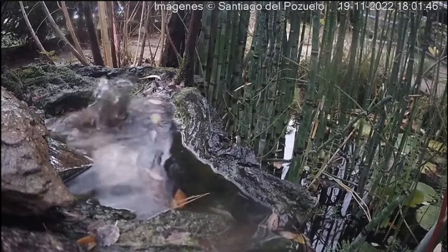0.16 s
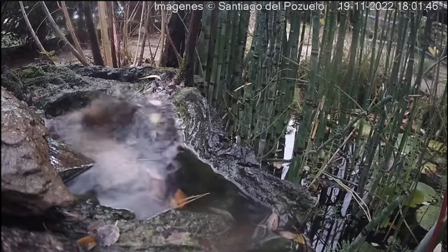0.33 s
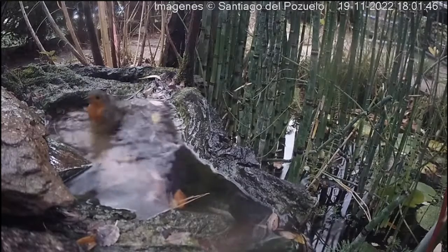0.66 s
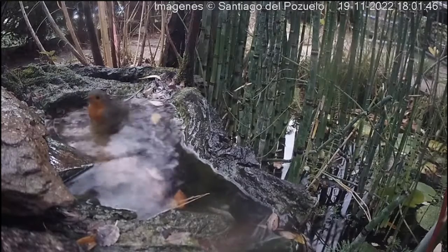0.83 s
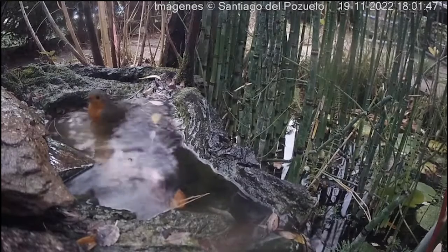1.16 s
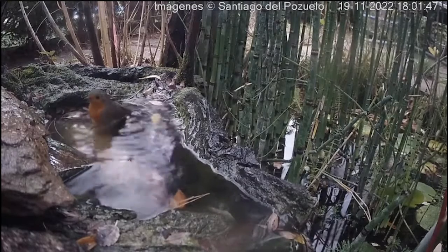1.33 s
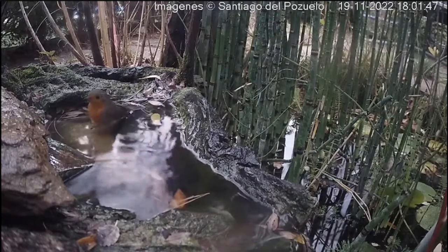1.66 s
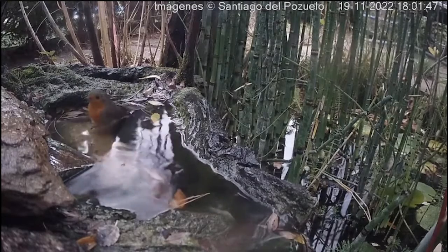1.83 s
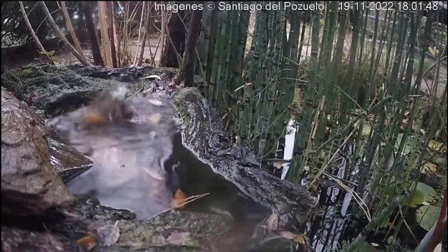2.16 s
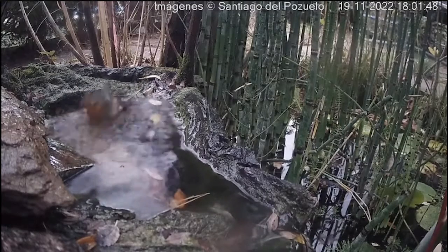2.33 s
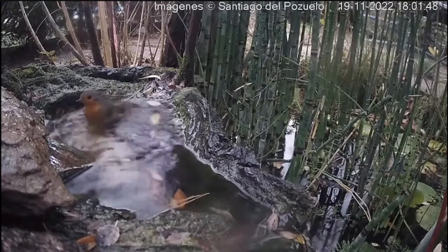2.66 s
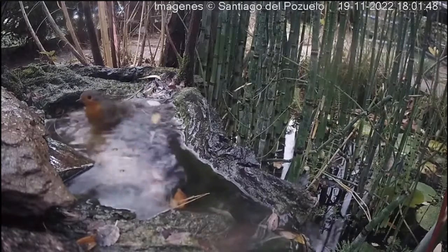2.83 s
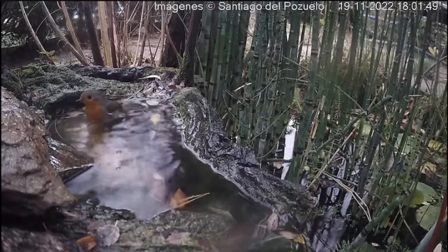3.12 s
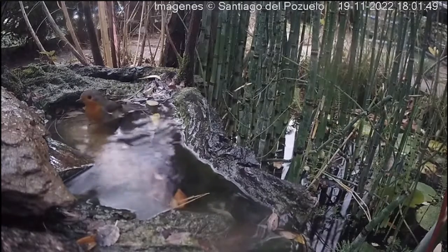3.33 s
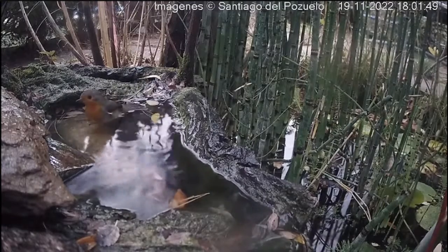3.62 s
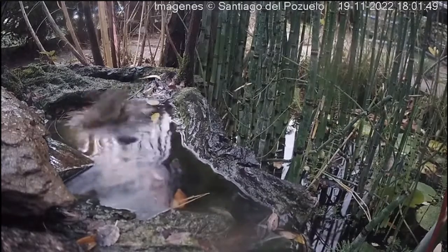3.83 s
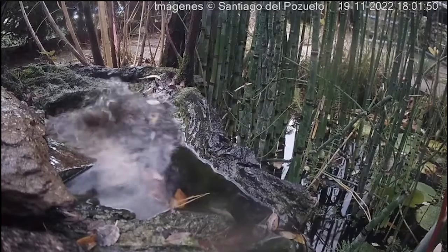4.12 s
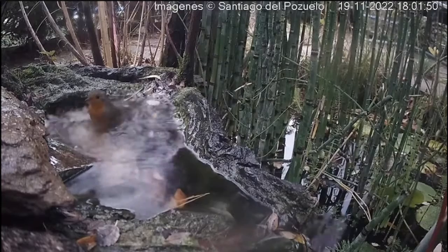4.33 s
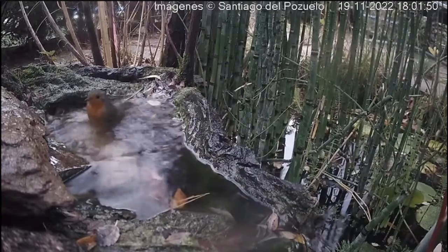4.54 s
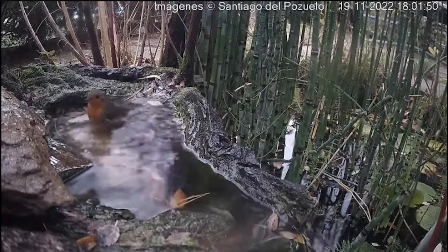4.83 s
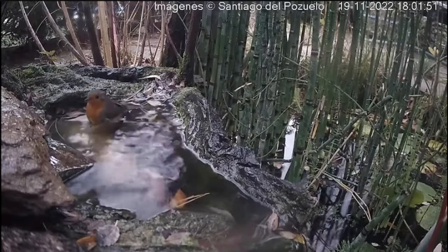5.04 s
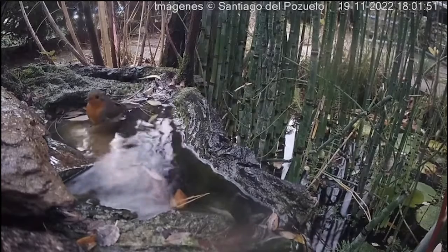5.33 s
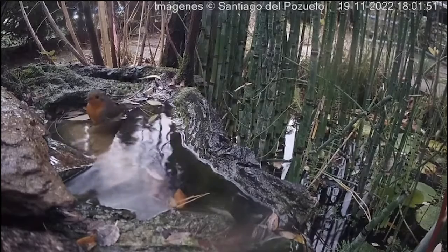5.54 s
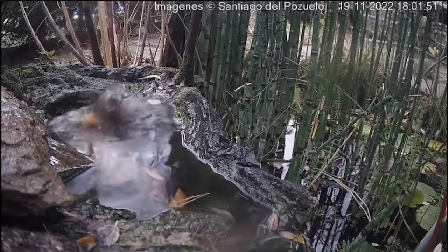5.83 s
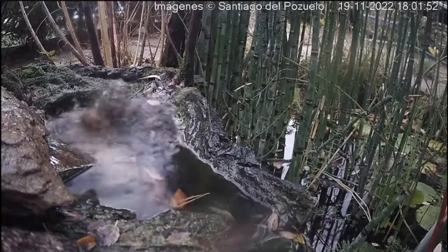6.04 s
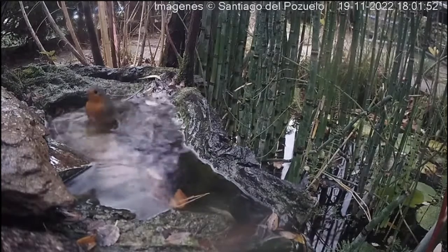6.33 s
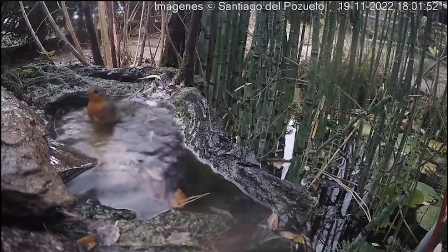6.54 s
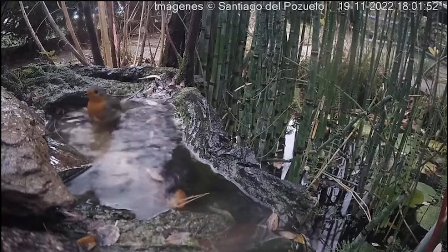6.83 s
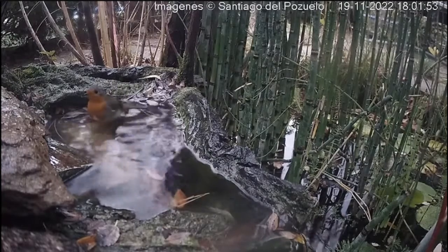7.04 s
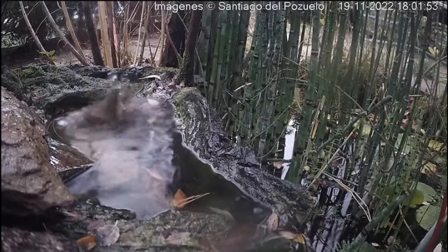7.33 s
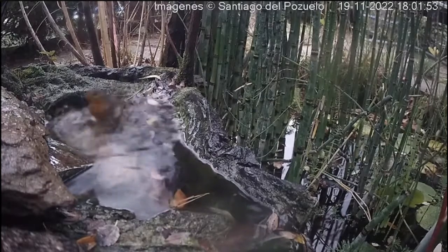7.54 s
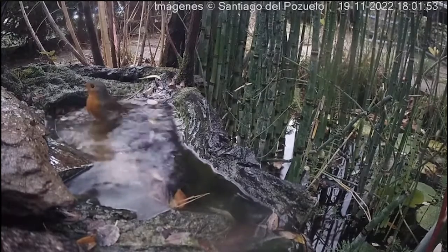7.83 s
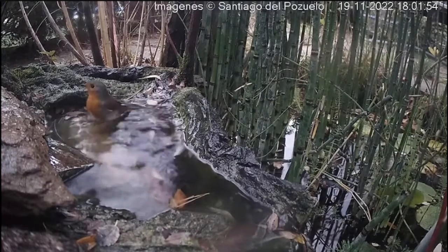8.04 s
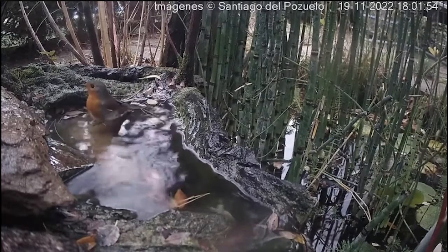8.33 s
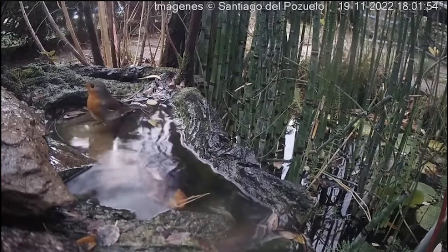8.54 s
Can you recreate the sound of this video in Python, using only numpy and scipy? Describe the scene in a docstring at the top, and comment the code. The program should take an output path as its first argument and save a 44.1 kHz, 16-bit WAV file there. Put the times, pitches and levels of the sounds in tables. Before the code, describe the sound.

Bursts of fast watery wing flutter, plopping and crackling in a small pond, separated by quiet pauses above a deep far-off traffic rush.

```python
"""A small bird bathes in a shallow garden pool, slapping its wet wings some twenty times a second in bursts.
Each slap is a low ring of trapped air, a crack of the surface and a dragged sheet of noise. Around it the
churned water fizzes, bubbles chirp upward, thrown drops tick on leaves and stones, wide clicks mark the onset
of bubbles and slaps and spray sloshes, all with a short leafy tail. Far off are traffic rumble, its rush and
a motor drone, made of shaped noise like the faint hiss of air and microphone."""
import sys
import numpy as np
from scipy import signal
from scipy.fft import rfft, irfft
from scipy.io import wavfile
from scipy.ndimage import uniform_filter1d

SR = 44100
rng = np.random.default_rng(int(sys.argv[2]) if len(sys.argv) > 2 else 0)


def unload_wav(signal):
    """Save mono or channel-first audio to the path in sys.argv[1] as 16-bit WAV at rate SR, clipped to [-1, 1]."""
    wavfile.write(
        sys.argv[1],
        SR,
        np.round(np.clip(np.atleast_2d(signal).T, -1, 1) * 32767).astype(np.int16),
    )


N = 382347  # samples


def gain_of(db):
    """Amplitude factor of a level in dB."""
    return 10 ** (np.asarray(db) / 20)


def evened(x):
    """Scales a sound to an rms of one."""
    return x / np.sqrt(np.mean(x ** 2) + 1e-20)


def peaked(x, db):
    """Scales a sound to a peak level in dB."""
    return gain_of(db) * x / (abs(x).max() + 1e-12)


def read_colour(colour, hz):
    """Reads a spectrum in dB along a logarithmic frequency axis."""
    f, db = np.transpose(colour)
    return np.interp(np.log(hz + 1), np.log(f + 1), db)


def add(mix, s, sound):
    """Lays a sound into the mix from a time in seconds."""
    part = mix[max(round(s * SR), 0):][:len(sound)]
    part += sound[:len(part)]


def ring(hz, t60, soft_s):
    """A tone dying by 60 dB in t60 seconds, with a soft start."""
    t60 = np.clip(t60, 0.003, 0.1)
    t = np.arange(round(t60 * SR)) / SR
    tone = np.sin(2 * np.pi * np.minimum(hz, 16000) * t)
    return tone * gain_of(-60 * t / t60) * (1 - np.exp(-t / soft_s))


def noise(colour, size, patchy_db, flicker_db):
    """Random short-time spectra with drifting patches and a flicker shared by all bins."""
    hop = size // 4
    frames, hz = N // hop + 5, np.fft.rfftfreq(size, 1 / SR)
    real, imag, patches = rng.standard_normal((frames, len(hz), 3)).T
    patches = uniform_filter1d(patches, size=9, axis=0)
    patches = evened(uniform_filter1d(patches, size=9, axis=1))
    flicker = evened(uniform_filter1d(rng.standard_normal(frames), size=3))
    level_db = read_colour(colour, hz)[:, None] + patchy_db * patches + flicker_db * flicker
    spectra = (real + 1j * imag) * gain_of(level_db)
    return evened(signal.istft(spectra, nperseg=size, noverlap=size - hop)[1][:N])


def droplets(colour, per_s, spread_db, cycles):
    """A crowd of tiny bubbles on 36 pitches, each pitch struck per_s times a second at random levels."""
    out = np.zeros(N)
    for hz, luck in zip(np.geomspace(800, 11000, num=36), rng.random(36)):
        chance = rng.random(N) * SR / per_s + 1e-9
        born = chance < 1
        strength = np.zeros(N)
        strength[born] = gain_of(spread_db * np.minimum(-np.log(chance[born]), 4))
        t = np.arange(round(cycles * (0.54 + luck) / hz * SR)) / SR
        life = t / t[-1]
        swell = np.sin(np.pi * np.sqrt(life)) ** 2
        blip = swell * np.sin(2 * np.pi * hz * t * (1 + 0.062 * life))
        out += signal.oaconvolve(strength, gain_of(read_colour(colour, hz)) * hz * blip)[:N]
    return evened(out)


def tilted(x, tilt_db):
    """Turns a sound darker or brighter, in dB per octave between 500 and 7000 Hz."""
    octaves = np.log2(np.clip(np.fft.rfftfreq(len(x), 1 / SR), 500, 7000) / 1500)
    return irfft(rfft(x) * gain_of(tilt_db * octaves), len(x))


def shaped(x, envelope):
    """Lays an envelope on a ragged sound so that the whole has the energy of the envelope."""
    return evened(x * envelope) * np.sqrt(np.mean(envelope ** 2))


def gusts():
    """Random swells, several a second: sixteen slow sines at 5-24 Hz, rms one."""
    t = np.arange(N) / SR
    return evened(sum(np.sin(2 * np.pi * (f * t + rng.random())) for f in np.geomspace(5, 24, num=16)))


# far traffic, deep rumble: colour (f/Hz, relative level/dB per Hz)
RUMBLE_COLOUR = [(7, -52), (12, 4.5), (28, 6), (40, -3), (62, 5.5), (90, -2), (125, -2), (160, -9.5),
                 (200, -23.5), (260, -47), (440, -120)]
# its course before the swells: (t/s, level/dB)
RUMBLE_LEVEL = [(0.0, -33), (0.9, -40.5), (1.13, -33), (1.88, -35.5), (2.05, -30.5), (2.34, -38),
                (2.8, -32.5), (3.2, -30.5), (3.52, -38.5), (4.45, -30.5), (4.6, -38.5), (5.3, -37),
                (5.65, -35.5), (6.33, -39), (6.57, -34), (7.03, -36), (7.8, -36.5), (8.04, -39.5),
                (8.67, -41.5)]
GUST_DB = 2.5  # rms depth of the swells


def rumble(swells):
    """Far traffic as deep noise that rises and falls with the swells."""
    level_db = np.interp(np.arange(N) / SR, *np.transpose(RUMBLE_LEVEL)) + GUST_DB * swells
    return gain_of(level_db) * noise(RUMBLE_COLOUR, size=2048, patchy_db=1.0, flicker_db=2.0)


# course of the higher background: (t/s, rush level/dB, hiss level/dB)
HIGH_LEVELS = [(0.0, -41.5, -62.5), (1.9, -40.5, -62.5), (3.16, -40, -61.5), (4.47, -39.5, -63),
               (4.7, -44, -67.5), (5.9, -42.5, -64.5), (6.3, -44.5, -66.5), (7.44, -42.5, -65),
               (8.67, -44, -65)]


def high_levels():
    """Gains of the rush and of the hiss over time."""
    s, *columns = np.transpose(HIGH_LEVELS)
    return [gain_of(np.interp(np.arange(N) / SR, s, db)) for db in columns]


# rush of the far traffic: colour (f/Hz, relative level/dB per Hz)
RUSH_COLOUR = [(65, -40), (110, 1.5), (490, -8.5), (1290, -23.5), (2120, -41), (3000, -43.5), (3900, -53.5),
               (6600, -120)]


def rush(level, swells):
    """The higher rush of the traffic, swelling only slightly."""
    return level * gain_of(0.34 * swells) * noise(RUSH_COLOUR, size=512, patchy_db=2.0, flicker_db=1.3)


# far motor, levels before they follow the rush: (f/Hz, width/Hz, level/dB, middle of the fade-out t/s)
DRONE = [(60.8, 8.9, -46, 7.9), (120.5, 10.4, -45, 5.17), (176.4, 4.2, -48, 6.3), (260.3, 5.2, -55.5, 5.9),
         (298, 8.2, -46, 0.83)]


def drone(rush_level):
    """A far motor: noise through narrow resonances wavers as it hums; each tone fades out in turn."""
    t, out = np.arange(N) / SR, np.zeros(N)
    for hz, width, db, end in DRONE:
        r = np.exp(-np.pi * width / SR)
        resonance = [1, -2 * r * np.cos(2 * np.pi * hz / SR), r * r]
        hum = evened(signal.lfilter([1], resonance, rng.standard_normal(N)))
        out += gain_of(db) * hum / (1 + np.exp(np.clip((t - end) / 0.16, -30, 30)))
    return out * rush_level / rush_level.mean()


# hiss of air and microphone: colour (f/Hz, relative level/dB per Hz)
HISS_COLOUR = [(880, -22), (1500, -1), (2130, -7.5), (4160, -10.5), (4550, -9), (5080, -12), (14700, -21),
               (15900, -21), (16400, -38)]


def hiss(level):
    """Faint high noise of air and microphone."""
    return level * noise(HISS_COLOUR, size=256, patchy_db=3.0, flicker_db=1.0)


def background():
    """All that lies behind the pool: rumble, rush and drone from afar, hiss at the microphone."""
    swells = gusts()
    rush_level, hiss_level = high_levels()
    return rumble(swells) + rush(rush_level, swells) + drone(rush_level) + hiss(hiss_level)


# water churned while the bird ducks, one list a bout, silent between: (t/s, level/dB before the layer gains)
CHURN = [
    [(0.0, -67), (0.09, -62), (0.224, -65), (0.54, -71), (0.958, -88), (1.22, -77)],
    [(1.85, -77), (1.986, -60), (2.12, -62), (2.278, -60), (2.4, -69)],
    [(2.5, -83), (3.0, -64.5)],
    [(3.7, -73), (3.868, -57.5), (4.02, -59), (4.112, -54), (4.334, -72), (4.584, -64), (4.72, -69),
     (4.8, -76)],
    [(5.6, -87), (5.708, -70), (5.904, -66), (6.198, -67.5), (6.444, -73), (6.72, -82)],
    [(7.05, -82), (7.174, -69), (7.306, -67), (7.5, -70)],
]
# its colour: (f/Hz, relative level/dB per Hz)
CHURN_COLOUR = [(470, -33), (800, 4), (1420, 3), (2350, -6), (2830, -6), (3660, -12), (5160, -13.5),
                (7280, -18.5), (15000, -37)]


def churn():
    """Droplets and fine crackle over a wet fizz."""
    t, level = np.arange(N) / SR, np.zeros(N)
    for bout in CHURN:
        s, db = np.transpose(bout)
        level += gain_of(np.interp(t, s, db, -120, -120))
    fizz = noise(CHURN_COLOUR, size=256, patchy_db=7.5, flicker_db=5.5)
    crowd = droplets(CHURN_COLOUR, per_s=170.0, spread_db=3.2, cycles=9.9)
    crackle = droplets(CHURN_COLOUR, per_s=60.0, spread_db=5.0, cycles=3.1)
    return uniform_filter1d(level, size=600) * (0.73 * crowd + 1.32 * fizz + 0.69 * crackle)


def trapped_air(t, hz, attack, ring_s):
    """A pocket of air shut in by the wing rings low and climbs; it is no sphere, so side modes ring too."""
    before, after = np.minimum(t, 0), np.maximum(t, 0)
    low, high = 1 + 0.37 * (rng.random(2) - 0.5)
    phase = np.round(rng.random()) / 2 + 0.12 * rng.random()  # turns: either polarity, slightly shifted
    rounded = np.hypot(after, attack) - attack
    air = 0
    for ratio, share, mode_s in (1, 1, ring_s), (1.26 * high, 0.22, 0.24 * ring_s), (0.817 * low, 0.3, ring_s):
        turns = ratio * hz * (t + 0.086 * after ** 2 / ring_s) + phase
        envelope = np.exp(-(before / attack) ** 2) * gain_of(-45 * rounded / mode_s)
        air = air + share * np.cos(2 * np.pi * turns) * envelope
    return air


# modes of the slapped surface: (f/Hz, nominal width/Hz that shortens the ring, relative level/dB)
CRACK_MODES = [(2040, 300, 5.5), (2510, 52, -3.5), (2780, 220, 8), (3750, 150, -10.5), (4440, 670, 5.5),
               (5800, 180, -6.5)]
CRACK_SCATTER, UNEVEN_DB = 0.1, 7  # full span of the random shift of each mode: share of its pitch, level


def surface_crack(tilt_db):
    """The struck surface rings briefly in several modes, never all alike."""
    crack = np.zeros(1200)
    for hz, width, mode_db in CRACK_MODES:
        bend = 1 + CRACK_SCATTER * (rng.random() - 0.5)
        lean_db = mode_db + tilt_db * np.log2(hz / 3000) + UNEVEN_DB * (rng.random() - 0.5)
        add(crack, 0, gain_of(lean_db) * ring(hz * bend, min(3.3 / width, 0.008), soft_s=0.00018))
    return crack


def dragged_sheet(t, wet, tilt_db):
    """A sheet of water swells and dies within milliseconds, then runs off the wing."""
    before, after = np.minimum(t, 0), np.maximum(t, 0)
    rise, fall = 1 + 0.37 * (rng.random(2) - 0.5)
    swell = np.exp(before / 0.0015 / rise ** 2 - after / 0.0019 / fall ** 2)
    swell = swell + 0.019 * np.exp(before / 0.00097 - after / 0.0053)  # the run-off
    piece = wet[int(rng.random() * (N - len(t))):][:len(t)]
    return shaped(tilted(piece, 0.37 * tilt_db), swell)


# wing slaps on the pool: (t/s of the peak, air peak level/dB, air f/Hz, crack peak level/dB, attack/s,
# ring time/s, sheet level/dB, brightness/dB per octave); attack and ring time are clipped in slaps()
SLAPS = [(0.025, -39, 1420, -70, 0.0019, 0.022, -46, 1.0),
         (0.2517, -35, 1420, -30.5, 0.0005, 0.005, -53, 8), (0.4241, -40, 1100, -54, 0.0006, 0.01, -53, 14),
         (0.4352, -32.5, 1430, -54, 0.0008, 0.011, -43, -1),
         (0.4834, -43, 860, -52, 0.0006, 0.0045, -41, 0), (0.5485, -36, 1060, -42, 0.00087, 0.004, -40, -1),
         (0.6126, -36.5, 1450, -53, 0.00038, 0.0054, -40.5, -1),
         (0.666, -44, 1040, -57, 0.0014, 0.008, -45, -3),
         (0.678, -29.5, 1480, -51, 0.0007, 0.006, -37, 0.5),
         (0.7336, -30.5, 1410, -39.5, 0.0027, 0.004, -34.5, 9),
         (0.774, -37, 1800, -40, 0.0005, 0.004, -50, 0), (0.7828, -35, 940, -38, 0.0004, 0.004, -47, 0),
         (0.8354, -22, 1220, -39, 0.00046, 0.0027, -36.5, 13),
         (0.8838, -25, 1340, -31, 0.0006, 0.004, -36, 8),
         (0.932, -24.5, 1120, -24.5, 0.00083, 0.016, -38, -1.5),
         (0.9825, -16, 1420, -24, 0.0005, 0.004, -31, 1.5),
         (1.036, -24.5, 820, -32, 0.00052, 0.0058, -30, 5), (1.042, -36, 1980, -31, 0.0011, 0.004, -58, 15),
         (1.0926, -15.5, 1390, -33.5, 0.001, 0.0029, -37, 6),
         (1.1541, -26.5, 1300, -35.5, 0.0021, 0.0045, -39, 8),
         (1.9958, -20.5, 1170, -36, 0.00023, 0.0028, -25.5, -3),
         (2.004, -36, 925, -28, 0.0017, 0.022, -30, -10), (2.5725, -33, 1180, -40, 0.0019, 0.019, -51, -2),
         (2.6233, -23, 1490, -42, 0.00087, 0.0033, -24, -19),
         (2.6324, -16.5, 1290, -38, 0.00071, 0.0062, -33, 7),
         (2.675, -24, 1120, -47, 0.002, 0.011, -34, -6),
         (2.6819, -13.5, 1230, -34, 0.00017, 0.0031, -27.5, 3),
         (2.727, -34, 1380, -39, 0.0007, 0.009, -31, -3),
         (2.7338, -22.5, 1260, -35, 0.00042, 0.0043, -26, 3.5),
         (2.779, -33, 1450, -49, 0.0008, 0.012, -37, -9), (2.7886, -23, 1520, -36, 0.0014, 0.0057, -34, 5),
         (2.8394, -37, 1310, -69, 0.0006, 0.007, -41, -3),
         (2.849, -30, 840, -30.5, 0.0004, 0.0045, -35, -3),
         (2.909, -33.5, 1090, -36, 0.0014, 0.004, -33.5, -3), (2.963, -46, 900, -60, 0.0011, 0.007, -58, 4),
         (3.8731, -37, 1080, -39, 0.0004, 0.019, -45, -6),
         (4.0124, -28, 1400, -52, 0.00079, 0.006, -40, -14),
         (4.1429, -32, 1790, -39, 0.0004, 0.019, -39, 5), (4.1822, -31.5, 970, -33, 0.0005, 0.03, -51, 3),
         (4.343, -34, 1520, -55, 0.00063, 0.0049, -42, 5),
         (4.3924, -33, 850, -52, 0.0009, 0.004, -48, -0.5),
         (4.4366, -41, 835, -54, 0.0025, 0.032, -58, 0.5),
         (4.4957, -33.5, 1530, -49, 0.0012, 0.005, -48, 23),
         (4.542, -34, 1540, -45, 0.00066, 0.02, -44, 1.5),
         (4.5975, -16.5, 1430, -28.5, 0.00035, 0.0051, -31, 5),
         (4.6408, -39, 856, -58, 0.0005, 0.004, -39, -0.5),
         (4.648, -14.5, 1390, -20, 0.00035, 0.0026, -30, 6.5),
         (4.7, -11.5, 1440, -25, 0.00046, 0.004, -29.5, 5),
         (4.761, -29, 1100, -47, 0.0016, 0.0045, -49, 13),
         (5.7655, -40.5, 1150, -53, 0.0005, 0.004, -45, 11),
         (5.8065, -38, 1340, -46, 0.00074, 0.005, -41, -6.0),
         (5.8638, -33, 1310, -51, 0.00099, 0.0073, -46, 0), (5.949, -40, 1060, -52, 0.0012, 0.01, -45, -3),
         (6.036, -38, 1080, -56, 0.0023, 0.008, -53, 7), (6.225, -40, 1250, -53, 0.0013, 0.008, -50, 0),
         (6.2884, -38, 1600, -59, 0.0006, 0.006, -50, -7),
         (6.2962, -31, 1410, -52, 0.00064, 0.007, -44, -12),
         (6.342, -34, 1190, -56, 0.00067, 0.006, -54, 7.0),
         (6.3533, -36, 1520, -60, 0.0013, 0.004, -50, 25),
         (6.401, -27, 1080, -30.5, 0.0006, 0.0049, -37, -2),
         (6.455, -30.5, 1570, -44, 0.0014, 0.0083, -38.5, 8),
         (6.5033, -30, 990, -46, 0.00082, 0.0046, -40, -1), (6.5122, -34, 1520, -43, 0.0019, 0.011, -44, 4),
         (6.5551, -36, 1050, -49, 0.0008, 0.012, -53, 9),
         (6.5647, -22.5, 1200, -40, 0.00053, 0.0032, -31.5, 6),
         (6.6235, -35, 1630, -31.5, 0.0005, 0.0046, -33.5, 4),
         (6.6865, -42, 1000, -62, 0.001, 0.043, -51, -3),
         (7.168, -40, 1250, -54, 0.0005, 0.004, -45.5, -12),
         (7.2263, -24, 980, -58, 0.00051, 0.0027, -35, -13), (7.325, -35, 1300, -54, 0.0007, 0.005, -41, 1),
         (7.3717, -41, 1690, -34.5, 0.0005, 0.006, -46, 3)]
# sheet of water under the wing, also the spray of the sloshes: (f/Hz, relative level/dB per Hz)
WET_COLOUR = [(350, -48), (600, -3.5), (1560, 2.5), (2810, -16.5), (3590, -16.5), (4530, -17), (5930, -32),
              (8840, -34.5), (10200, -39.5), (13000, -46)]


def slaps():
    """The wing drags a sheet of water, shuts in a pocket of air and cracks the surface."""
    out, t = np.zeros(N), np.arange(-600, 1600) / SR
    wet = noise(WET_COLOUR, size=256, patchy_db=4.5, flicker_db=4.0)
    wet = wet + 0.44 * droplets(WET_COLOUR, per_s=40.0, spread_db=1.0, cycles=16.2)
    for s, air_db, hz, crack_db, attack, ring_s, sheet_db, tilt_db in SLAPS:
        attack, ring_s = np.clip(attack, 0.0002, 0.004), np.clip(ring_s, 0.003, 0.04)
        add(out, s + t[0], peaked(trapped_air(t, hz, attack, ring_s), air_db))
        add(out, s - 0.0005, peaked(surface_crack(tilt_db), crack_db))
        add(out, s + t[0], gain_of(sheet_db) * dragged_sheet(t, wet, tilt_db))
    return out


# bubbles in the pool: (t/s of the peak, peak level/dB, f/Hz, length/s, shaped as at least 1.5 ms)
BUBBLES = [(.061, -53, 3970, .003), (.083, -51, 6400, 0.0014), (0.0968, -45.5, 5800, .0015),
           (0.195, -51, 4050, .002), (0.218, -40, 3000, .0015), (0.202, -50, 5910, .004),
           (0.2185, -38, 4500, 0.0015), (0.224, -43, 5010, .0015), (0.226, -49, 3070, .0015),
           (0.247, -35, 3150, .0015), (0.252, -28, 3570, 0.0014), (0.262, -46, 2980, 0.0054),
           (.273, -49, 2980, .002), (0.4141, -50, 4340, 0.0029), (0.6026, -43, 6560, .0015),
           (0.885, -31.5, 2100, 0.0013), (0.977, -36, 990, 0.0026), (1.036, -27.5, 451, 0.0046),
           (1.042, -42, 6150, 0.0014), (1.241, -51, 2310, .003), (0.931, -35, 2950, 0.0014),
           (1.042, -33.5, 2180, 0.0034), (1.4432, -36.5, 3980, 0.0013), (1.72, -47, 2260, 0.0037),
           (1.927, -42, 2940, .0015), (1.9361, -46, 5560, .0015), (1.994, -33, 1830, 0.0037),
           (2.03, -40, 4120, 0.0025), (2.102, -61, 2200, .006), (2.118, -42, 3070, 0.003),
           (2.122, -42, 2850, 0.003), (2.154, -28.5, 2620, 0.0021), (2.156, -26.5, 3000, 0.002),
           (2.1605, -47, 3350, .0015), (2.1606, -40.5, 6360, .0015), (2.209, -49, 3020, .003),
           (2.221, -49, 6700, .0015), (2.232, -46, 5140, .0015), (2.233, -38.5, 2940, 0.005),
           (2.26, -41, 2790, .0015), (2.272, -42, 5710, .0015), (2.276, -29.5, 3480, 0.0021),
           (2.504, -48, 2160, 0.0039), (2.579, -40, 1600, .003), (2.582, -45, 2050, .002),
           (2.664, -50, 2380, 0.0036), (2.668, -48, 2200, .003), (2.523, -46, 2300, 0.0028),
           (2.789, -41, 5000, 0.0017), (2.981, -39, 1470, 0.0027), (2.677, -28, 409.4, 0.0051),
           (3.087, -43.5, 3910, .0015), (3.832, -54, 5090, .003), (3.84, -41.5, 1920, 0.0066),
           (3.895, -50, 2680, .003), (3.827, -52, 4000, .003), (3.962, -48, 3000, .0015),
           (3.965, -50, 2500, .002), (4.01, -42, 2600, .002), (4.095, -42, 2100, .002),
           (4.145, -38, 1800, .003), (3.967, -44, 6260, .0019), (3.989, -39, 3030, .0015),
           (3.993, -46, 6700, .0015), (3.994, -49, 5430, .0015), (4.006, -34, 1480, 0.0033),
           (4.0255, -26, 5260, 0.0019), (4.0264, -34, 2040, 0.0026), (4.03, -36, 3400, 0.002),
           (4.044, -41, 5090, .0015), (4.045, -43, 2780, .0015), (4.0453, -32, 6500, 0.0014),
           (4.0583, -26, 2900, 0.0027), (4.061, -22.5, 2750, 0.0021), (4.0655, -27, 3100, 0.0016),
           (4.089, -38, 2100, 0.0038), (4.107, -33, 1300, 0.0014), (4.1071, -38, 2070, .0015),
           (4.1085, -37, 3970, 0.0036), (4.1191, -33.5, 2610, 0.0013), (4.129, -44, 5160, 0.0022),
           (4.146, -39, 3000, .0015), (4.156, -36, 4160, 0.0017), (4.166, -47, 5260, .003),
           (4.167, -43, 2500, .002), (4.185, -37, 4700, .002), (4.188, -36, 3180, 0.0042),
           (4.216, -56, 4600, .002), (4.2365, -34.5, 5170, 0.0023), (4.266, -41.5, 6400, 0.0014),
           (4.276, -50, 6120, .0015), (4.345, -37, 772, 0.008), (4.39, -42, 700, .005),
           (4.431, -30.5, 520, 0.0042), (4.502, -54, 4050, .0015), (4.454, -49, 4900, .0015),
           (4.5496, -46, 2620, .0025), (4.55, -49, 4100, .0015), (4.538, -40, 1600, .003),
           (4.588, -28, 1151, .003), (4.589, -45, 2990, .002), (4.605, -40, 429, 0.014),
           (4.701, -27, 1900, 0.0021), (4.762, -40, 2200, 0.0022), (4.97, -40, 491, 0.028),
           (4.978, -52.5, 3630, .0035), (5.68, -35, 1740, 0.003), (5.698, -45, 1900, 0.0029),
           (5.716, -52, 5000, .0015), (5.717, -50, 2400, .002), (5.736, -54, 3600, .003),
           (5.851, -52, 2800, .003), (5.765, -49, 1990, 0.0016), (5.766, -44, 4340, .0015),
           (5.8, -49, 5310, 0.0018), (5.815, -37.5, 6000, 0.0022), (5.9303, -44, 6820, 0.0017),
           (5.931, -31.5, 4340, .0015), (5.9347, -35, 4700, .0015), (5.868, -33, 1250, 0.0026),
           (5.95, -43, 3880, 0.0031), (6.0031, -47, 5100, .002), (6.004, -42, 6230, 0.002),
           (6.054, -46, 3880, .002), (6.064, -51, 3860, .002), (6.058, -42, 2790, .0015),
           (6.066, -37, 1860, .002), (6.077, -42, 4870, .0032), (6.081, -34.5, 2440, 0.0038),
           (6.0854, -30.5, 5090, .0015), (6.091, -40, 2930, 0.0014), (6.11, -47, 2800, 0.0043),
           (6.188, -41, 4920, 0.0019), (6.967, -41, 272, .004), (6.96, -27, 445, 0.0028),
           (7.15, -44, 2080, .0015), (7.156, -47, 3030, .0021), (7.145, -47, 900, .003),
           (7.172, -43, 1290, .002), (7.236, -52, 3280, .002), (7.348, -55, 2000, .002),
           (7.17, -47, 2490, .003), (7.255, -52, 2550, .003), (7.273, -47, 2200, .0015),
           (7.28, -45, 1700, .002), (7.371, -34, 3640, 0.0015), (7.392, -49, 2810, .002),
           (7.405, -58, 2850, .002), (7.372, -35.5, 515, 0.019), (7.44, -44, 515, 0.02),
           (7.52, -45.5, 510, 0.022), (7.571, -45.5, 3680, 0.0028), (7.794, -52, 6120, 0.0022),
           (8.3101, -51, 3660, .0015), (8.37, -46.5, 4300, 0.0021)]
RISE = 0.0429  # share by which a bubble's pitch climbs


def bubbles():
    """A bubble swells, sings upward and is torn by the moving water; a small tick as the drop enters."""
    out, t = np.zeros(N), np.arange(-1500, 2500) / SR
    for s, db, hz, length in BUBBLES:
        u = t / np.clip(length, 0.0015, 0.04)
        shape = gain_of(-np.where(u < 0, 20.0 * u ** 2, 13.3 * abs(u) ** 0.79))
        shake = evened(uniform_filter1d(rng.standard_normal(len(t)), size=40))
        bend = 1 + RISE * np.tanh(u) / 2 + 0.037 * shake
        add(out, s + t[0], gain_of(db) * shape * np.sin(2 * np.pi * np.cumsum(hz * bend) / SR))
        add(out, s - 0.46 * length, peaked(ring(1.74 * hz, 0.0012, soft_s=0.0001), db - 22.0))
    return out


# thrown drops ticking on leaves and stones: (t/s, peak level/dB, f/Hz)
TICKS = [(0.075, -48, 11400), (0.176, -49, 9900), (0.2024, -46, 9400), (0.219, -49, 13200),
         (0.2513, -45, 8900), (0.275, -48, 9800), (0.29, -50, 8500), (0.571, -49, 12000),
         (0.6025, -39.5, 7430), (0.7896, -46, 10600), (0.9303, -44, 8500), (1.1104, -50, 14800),
         (1.1648, -48, 11200), (1.509, -41, 10740), (1.5693, -49, 8690), (1.604, -47, 7300),
         (1.717, -47, 8970), (1.997, -40, 11360), (1.9959, -42, 8450), (2.1735, -47, 9080),
         (2.2648, -49, 8700), (2.426, -47, 8830), (2.5606, -40, 8100), (2.6863, -34, 9800),
         (2.7797, -39, 10600), (2.843, -40, 8660), (3.0856, -42, 10900), (3.086, -43, 15000),
         (3.4516, -46, 9800), (3.6067, -47, 8130), (3.8611, -44, 8000), (3.9459, -46, 8550),
         (3.993, -44, 8900), (4.0225, -40, 7640), (4.0657, -41, 7900), (4.095, -48, 12800),
         (4.2153, -43, 13200), (4.247, -48, 12000), (4.4149, -47, 8140), (4.647, -44, 10100),
         (4.6972, -33.5, 7280), (5.2046, -51, 8200), (5.8072, -46, 9900), (5.9284, -44, 8200),
         (6.0841, -49, 13600), (6.8977, -48, 11500), (7.3632, -42, 13300), (7.651, -50, 8000),
         (7.7039, -45, 9600), (7.7328, -47, 11000), (8.3843, -49, 11100), (8.5255, -47, 9960),
         (8.5884, -47, 9890)]
TICK_T60_S, FAINT_TICK_DB, FAINT_SPREAD_DB = 0.01, -64.5, 17.5  # faint ticks: lowest level, span above it


def ticks():
    """Short bright puffs around one pitch; fainter ones fall at random."""
    out = np.zeros(N)
    faint = rng.random((120, 3)) * [N / SR, FAINT_SPREAD_DB, 9000] + [0, FAINT_TICK_DB, 5000]
    for s, db, hz in [*TICKS, *faint]:
        tone = ring(hz, TICK_T60_S, soft_s=0.00026)
        ragged = uniform_filter1d(rng.standard_normal(4410), size=6)[:len(tone)]
        add(out, s, peaked(tone * (1 + 2.2 * ragged), db))
    return out


# wide clicks at the onset of bubbles and slaps: (t/s, peak level/dB, middle f/Hz)
ONSET_CLICKS = [(0.218, -38, 3500), (0.602, -45, 7000), (0.885, -31, 3020), (0.982, -21.5, 2390),
                (1.936, -42, 4500), (1.946, -39, 2300), (1.989, -35, 1900), (2.029, -33, 3600),
                (2.095, -44, 2800), (2.114, -48, 3500), (2.221, -44, 6500), (2.231, -42, 3800),
                (2.259, -44, 2800), (2.274, -42, 4200), (2.6235, -33, 2600), (2.681, -23, 2200),
                (2.733, -36, 2600), (3.988, -46, 2800), (4.0245, -25, 5060), (4.044, -36, 3500),
                (4.057, -36, 4000), (4.086, -44, 2200), (4.107, -36, 2600), (4.129, -40, 4500),
                (4.144, -30, 2600), (4.156, -44, 3800), (4.178, -36, 4200), (4.188, -35, 2500),
                (4.206, -42, 2500), (4.216, -48, 4000), (4.649, -30, 2600), (4.6991, -20, 2180),
                (5.764, -49, 3200), (5.864, -39, 2200), (5.929, -40, 5500), (6.003, -42, 5800),
                (6.047, -46, 3000), (6.057, -46, 2300), (6.081, -45, 3200), (6.086, -40, 6000),
                (6.106, -46, 3300), (6.119, -50, 5000), (7.2252, -36, 1900), (7.268, -43, 3000),
                (7.341, -48, 4200), (7.371, -30, 3600)]
CLICK_CYCLES = 1  # cycles in which the click decays to 1/e


def onset_clicks():
    """Wide clicks at the onset of bubbles and slaps: about one swing of pressure and a weaker, later second."""
    out = np.zeros(N)
    t = np.arange(-100, 200) / SR
    for s, db, hz in ONSET_CLICKS:
        turns = t * hz
        decay = np.exp(-abs(turns) / np.where(turns < 0, 0.3, CLICK_CYCLES))
        click = np.sin(2 * np.pi * (turns + rng.random())) * decay
        delay = 0.00048 + 0.0019 * rng.random()
        add(out, s + t[0], peaked(click, db))
        add(out, s + t[0] + delay, peaked(click, db - 9.0))
    return out


# short sheets of water thrown up: (t/s of the middle, level/dB, tilt/dB per octave)
SLOSHES = [(0.225, -47, 7), (0.255, -45.5, 4), (0.779, -49, 5), (0.926, -49.5, -6), (1.032, -51, 0),
           (1.939, -52, 6), (2.031, -48, 5), (2.103, -48, 0.5), (2.231, -49, 6), (2.267, -54, 12),
           (2.574, -42.5, 3), (3.807, -45, -1.5), (3.877, -49, 0), (3.909, -53, 8.5), (3.966, -52, -7),
           (3.998, -43, 2), (4.03, -53, 11), (4.05, -50, -2), (4.072, -52, 2), (4.095, -62, -4),
           (4.115, -52, 0), (4.163, -48, 5), (4.13, -46, -10), (4.182, -43, 4.5), (4.209, -52, 7),
           (4.348, -44, -3), (4.4, -47, -1.5), (4.453, -49, 1), (4.494, -49, -3), (4.547, -49, 7.5),
           (4.591, -39, 1), (5.732, -57, 3), (5.72, -54, 0), (5.808, -53, 0), (5.838, -58, 0),
           (5.869, -48, 5), (5.91, -58, 4.5), (6.135, -57, -8), (6.16, -60, 2), (5.963, -49.5, 3),
           (6.054, -51, 4), (6.084, -44.5, 9), (6.114, -54, 5), (6.231, -49, -9), (6.296, -46, -1),
           (6.349, -43, -6), (7.143, -56, 0), (7.165, -52, -2), (7.25, -57, 7), (7.179, -58, 5.5),
           (7.235, -60, 13), (7.27, -55.5, 4), (7.2, -58, 2), (7.29, -59, 2), (7.346, -53, -3),
           (7.387, -57, 2), (7.37, -47, 8), (7.401, -59, 9)]
SLOSH_S = 0.0096  # from the middle to where the level has dropped to 1/e squared


def sloshes():
    """Ragged bursts of spray, each with its own tilt toward dark or bright."""
    out, t = np.zeros(N), np.linspace(-1, 1, num=4096) * 2048 / SR
    spray = noise(WET_COLOUR, size=256, patchy_db=4.5, flicker_db=1.0)
    spray = spray + 1.7 * droplets(WET_COLOUR, per_s=100.0, spread_db=3.0, cycles=11.7)
    burst = np.exp(-2 * (t / SLOSH_S) ** 2)
    for s, db, tilt_db in SLOSHES:
        piece = spray[int(rng.random() * (N - len(t))):][:len(t)]
        add(out, s + t[0], gain_of(db) * shaped(tilted(piece, tilt_db), burst))
    return out


def garden_tail(x):
    """Adds the garden's short, faint leafy tail: decaying noise that starts after 2 ms."""
    t = np.arange(4000) / SR
    tail = rng.standard_normal(len(t)) * gain_of(-60 * t / 0.017) * (t > 0.002)
    return x + gain_of(-11.0) * signal.oaconvolve(x, tail / np.linalg.norm(tail))[:N]


def scene():
    """The pool with its garden tail, over the background; one channel."""
    pool = churn() + slaps() + bubbles() + ticks() + onset_clicks() + sloshes()
    return (garden_tail(pool) + background())[None]


EDGE_HZ = 15900


def record(dry):
    """The upper band limit of the recorder: a steep low-pass."""
    low_pass = signal.firwin(511, EDGE_HZ, window=("kaiser", 9), fs=SR)
    return signal.oaconvolve(dry, low_pass[None], "same")


dry = scene()
out = record(dry)
unload_wav(out)
```